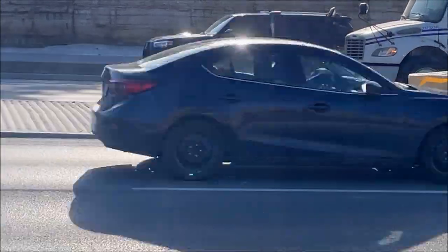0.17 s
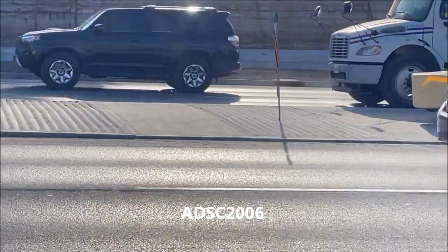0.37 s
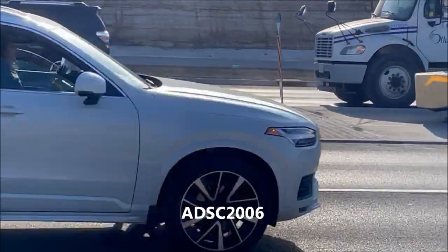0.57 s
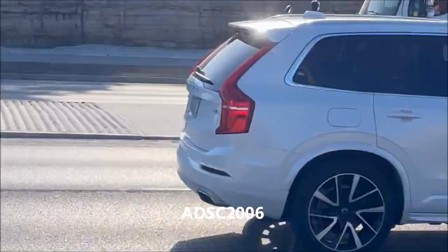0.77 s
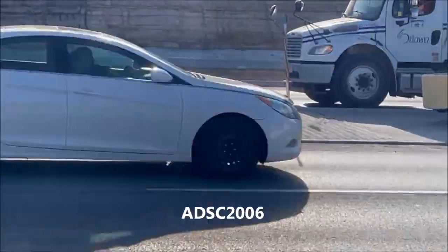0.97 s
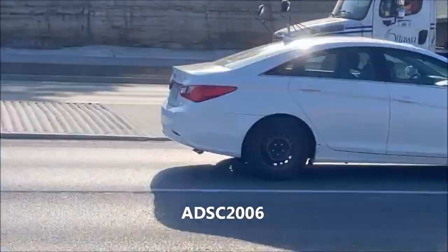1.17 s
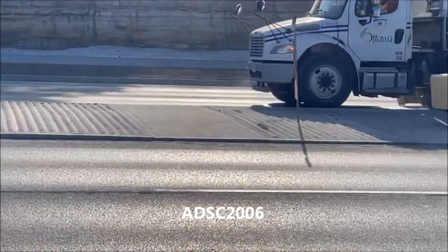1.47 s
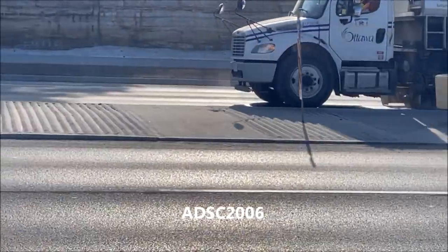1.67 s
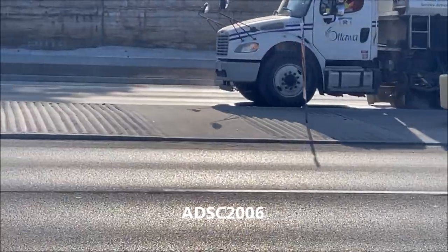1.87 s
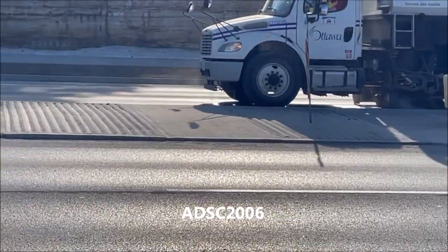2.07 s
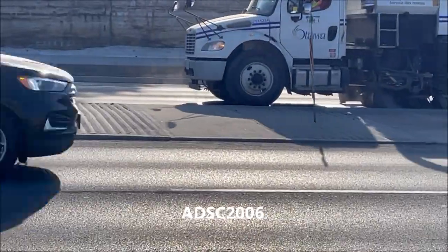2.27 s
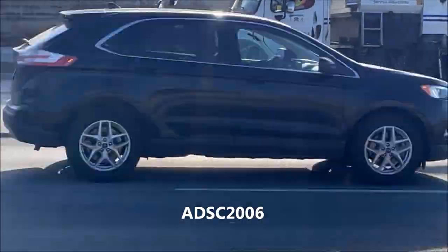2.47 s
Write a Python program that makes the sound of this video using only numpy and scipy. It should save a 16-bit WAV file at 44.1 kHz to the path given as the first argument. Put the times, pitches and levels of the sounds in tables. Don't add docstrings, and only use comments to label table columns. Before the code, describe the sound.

Busy road traffic roars close by as cars whoosh past left to right over low engine rumble

```python
import sys
import numpy as np
from scipy import signal
from scipy.io import wavfile
from scipy.ndimage import uniform_filter1d

SR = 44100
rng = np.random.default_rng(int(sys.argv[2]) if len(sys.argv) > 2 else 0)


def master_out(mix):
    frames = np.transpose(np.atleast_2d(mix))
    ceiling = np.clip(frames, -1, 1)
    pcm = np.round(ceiling * 32767).astype(np.int16)
    wavfile.write(sys.argv[1], SR, pcm)


def how_loud(loudness_db):
    steps = np.asarray(loudness_db, float) / 20
    return 10 ** steps


N = 115983
FRAME, HOP = 1024, 256

# closest approach t/s, level/dB, distance/m, road echo/ms, brightness/(dB per octave)
CARS = [
    (.27, -28.5, 7.8, 1.37, 2.),
    (.76, -23, 6.45, 1.064, -0.1),
    (1.2, -28, 6.6, 1.154, -1.5),
    (2.38, -29, 4.5, 1.065, 3.5),
]
# f/Hz, density/dB
TYRE_SPECTRUM = [(150, -10.5), (430, -8.5), (800, 1), (1300, -0.5), (2000, -3), (3200, -14.5), (6000, -24),
                 (11000, -44.5)]
# f/Hz, density/dB
FAR_SPECTRUM = [(150, -21), (430, -7), (900, -3.5), (1250, -6), (1750, -1), (2200, -7), (3200, -12),
                (9000, -39)]
# f/Hz, density/dB
RUMBLE_SPECTRUM = [(12, -41), (20, -13), (42, -4.5), (65, 0), (134, -4.5), (206, -5.5), (248, -8),
                   (392, -16), (500, -17), (650, -6), (1100, -120)]
# f/Hz, density/dB
HISS_SPECTRUM = [(2000, 8), (4000, 13.5), (7500, 7), (10000, -0.5), (13500, -14.5), (15500, -4.5),
                 (15800, -3), (15900, -60)]
# t/s, level/dB
HISS_EFFORT = [(0.2, -48.5), (0.63, -49), (0.66, -47), (1.03, -57), (1.2, -52.5), (1.39, -58), (1.55, -51),
               (1.72, -52), (1.95, -51), (2.13, -46), (2.18, -50.5), (2.24, -43), (2.44, -48.5),
               (2.62, -44.5)]
# t/s, f/Hz
TRUCK_FIRING = [(.17, 53.97), (1.0, 55), (1.8, 54.01), (2.63, 55)]
# multiple of the firing rate, level/dB, width/Hz
TRUCK_ORDERS = [(1, -32.5, 15), (3, -39, 16), (4, -41, 5), (6, -42.5, 3)]
# t/s, firing f/Hz, level/dB
PULLING_AWAY = [(.17, 62.35, -39), (1.1, 68, -31.5), (1.8, 67.26, -35), (2.249, 79.4, -29),
                (2.63, 88.6, -26.5)]
# t/s, level/dB, f/Hz, length/s
JOINT_BOOMS = [(0.253, -23, 56.7, 0.057), (0.474, -23, 54.4, 0.032), (0.62, -28.5, 68.96, .08),
               (0.766, -32, 235, 0.078), (0.926, -20, 57, 0.04), (1.117, -27.5, 219, 0.045),
               (1.17, -23.5, 117.8, 0.052), (1.39, -27, 97.5, 0.1), (1.658, -27, 211.3, 0.06),
               (1.785, -28, 64.3, 0.054), (1.919, -27, 149.6, 0.073), (2.62, -22, 50, 0.065)]
# f/Hz, coherence/1
PORT_LIKENESS = [(40, .9), (140, .64), (600, .88), (1250, .66), (2150, .78), (2900, .93), (5000, .977),
                 (7000, .95)]
# f/Hz, lead/rad
PORT_LEAD = [(1250, 0.034), (1600, 3.1), (2000, 6.96), (3100, 6.26), (4000, 7.1), (5100, 5.3), (6200, 7.8),
             (7100, 7.27)]
# f/Hz, lead/rad
SIDE_LEAD_CURVE = [(200, -0.14), (1300, 0.64), (1600, 0.13), (2600, 0)]
# f/Hz, lag/rad
ASIDE_LAG_CURVE = [(1300, 0.5), (1500, 0), (1700, 1.34), (2050, 3.5), (2300, 0), (3000, 0)]
# f/Hz, level/dB
PORT_SHADOW = [(150, 3), (400, 3), (1100, 7), (1500, 2.5), (1800, 2.5), (2500, 2), (3000, 3.5), (4000, -1)]
# f/Hz, level/dB
AHEAD_RESPONSE = [(1350, 1), (1600, -12), (1800, 1), (2050, 4), (2400, -3), (2850, 1), (3200, 1)]


def read(points, hz):
    f, value = np.transpose(points)
    return np.interp(np.log(hz + 1), np.log(f + 1), value)


def evened(x):
    return x / np.sqrt(np.mean(x ** 2) + 1e-20)


def grid():
    return np.fft.rfftfreq(FRAME, 1 / SR)[:, None], np.arange(N // HOP + 5)[None] * HOP / SR


def smooth(noise, bins, frames):
    return evened(uniform_filter1d(uniform_filter1d(noise, size=bins, axis=0), size=frames, axis=1))


def port_lead(hz, side):
    join_hz, delay_hz, turn_hz = 7100, 8620, 4170
    delay = 3 * np.pi + 2 * np.pi * (hz - delay_hz) / turn_hz
    bridge = np.interp(hz, [join_hz, delay_hz], [PORT_LEAD[-1][1], 3 * np.pi])
    upper = np.where(hz < delay_hz, bridge, delay)
    lead = np.where(hz < join_hz, read(PORT_LEAD, hz), upper)
    return lead + side * read(SIDE_LEAD_CURVE, hz) - abs(side) * read(ASIDE_LAG_CURVE, hz)


def field(colour_db, move_db, side, patchy_db, flicker_db):
    hz, t = grid()
    a, b, c, d, p = rng.standard_normal((t.size, hz.size, 5)).T
    patches = smooth(p, bins=12, frames=14)
    flicker = smooth(a, bins=150, frames=5)
    same = np.clip(read(PORT_LIKENESS, hz), 0, 1)
    left = a + 1j * b
    right = same * left + np.sqrt(1 - same ** 2) * (c + 1j * d)
    right = right * np.exp(-1j * port_lead(hz, side))
    lean = how_loud(side * read(PORT_SHADOW, hz) / 2)
    colour = how_loud(colour_db) / np.sqrt(np.mean(how_loud(colour_db) ** 2))
    ahead_db = (0.5 - abs(side)) * read(AHEAD_RESPONSE, hz)
    gain = how_loud(move_db + ahead_db + patchy_db * patches + flicker_db * flicker)
    z = np.array([left * lean, right / lean]) * colour * gain
    return signal.istft(z, nperseg=FRAME, noverlap=FRAME - HOP)[1][:, :N] / np.sqrt(FRAME / 3)


def car(closest, level_db, metres, echo_ms, bright_db):
    speed_m_s, echo_share, echo_power = 11.2, 0.26, 0.092
    hz, t = grid()
    along = speed_m_s * (t - closest)
    reach = np.hypot(along, metres)
    lag = echo_ms / 1000 * (metres / reach) ** echo_power
    comb = abs(1 + echo_share * np.exp(2j * np.pi * hz * lag))
    move_db = level_db + 20 * np.log10(comb * metres / reach)
    colour_db = read(TYRE_SPECTRUM, hz) + bright_db * np.log2(np.maximum(hz / 1000, 1))
    return field(colour_db, move_db, -along / reach, patchy_db=1.58, flicker_db=0.16)


def traffic():
    hz, t = grid()
    far_db, rumble_db = -28, -25
    far = field(read(FAR_SPECTRUM, hz), far_db + 0 * t, -0.74, patchy_db=.4, flicker_db=.15)
    low_db = read(RUMBLE_SPECTRUM, hz) - 30. * np.log2(np.maximum(hz / 540.0, 1))
    return far + field(low_db, rumble_db + 0 * t, 0.093, patchy_db=1.5, flicker_db=0.55)


def hiss():
    level_db, tilt_per_octave, pivot_hz = 13, 0.24, 10100
    air_loss_db_per_s, air_hz = 5, 14000
    hz, t = grid()
    when, db = np.transpose(HISS_EFFORT)
    swell_db = np.interp(t, when, db) - db.mean()
    air_db = air_loss_db_per_s * (t - 1.6) * (hz / air_hz) ** 4
    tilt = 1 + tilt_per_octave * np.log2((hz + 100) / pivot_hz)
    move_db = level_db + db.mean() + tilt * swell_db + air_db
    return field(read(HISS_SPECTRUM, hz), move_db, 0, patchy_db=1.1, flicker_db=.4)


def waver(hz, width_hz):
    r = np.exp(-np.pi * width_hz / SR)
    slow = rng.standard_normal((2, N))
    for _ in range(2):
        slow = signal.lfilter([1], [1, -r], slow)
    carrier = np.exp(2j * np.pi * np.cumsum(hz) / SR)
    return evened((carrier * (slow[0] + 1j * slow[1])).real)


def truck():
    t = np.arange(N) / SR
    firing = np.interp(t, *np.transpose(TRUCK_FIRING))
    orders = sum(how_loud(db) * waver(multiple * firing, width_hz) for multiple, db, width_hz in TRUCK_ORDERS)
    orders = orders * how_loud(-1.5 * (t - 1.1))
    when, hz, db = np.transpose(PULLING_AWAY)
    pulling = how_loud(np.interp(t, when, db)) * waver(np.interp(t, when, hz), width_hz=12.7)
    return orders + pulling


def booms():
    t = np.arange(N) / SR
    total = np.zeros(N)
    for s, db, hz, length in JOINT_BOOMS:
        swell = np.exp(-(2 * (t - s) / length) ** 2)
        total += how_loud(db) * np.sqrt(2) * swell * np.sin(2 * np.pi * (hz * t + rng.random()))
    return total


def scene():
    return sum(car(*row) for row in CARS) + traffic() + hiss() + truck() + booms()


def roll_off(x):
    return signal.sosfilt(signal.butter(12, 16920, fs=SR, output="sos"), x)


def record(dry):
    start_s, open_s = .1694, .0004
    low_pass = signal.firwin(1023, 15790, window=("kaiser", 9), fs=SR)
    high_pass = signal.butter(4, 40, "high", fs=SR, output="sos")
    cut = signal.oaconvolve(dry, low_pass[None], "same")
    cut = signal.sosfilt(high_pass, cut)
    gate = np.clip((np.arange(N) / SR - start_s) / open_s, 0, 1)
    return roll_off(cut * gate)


dry = scene()
out = record(dry)
master_out(out)
```